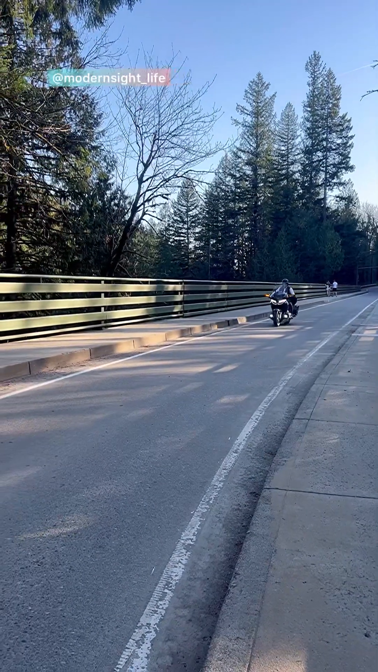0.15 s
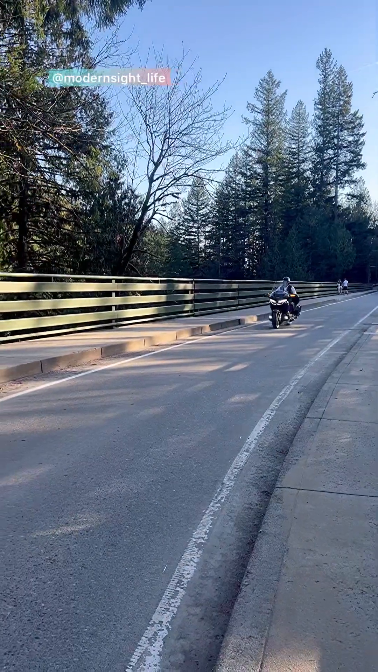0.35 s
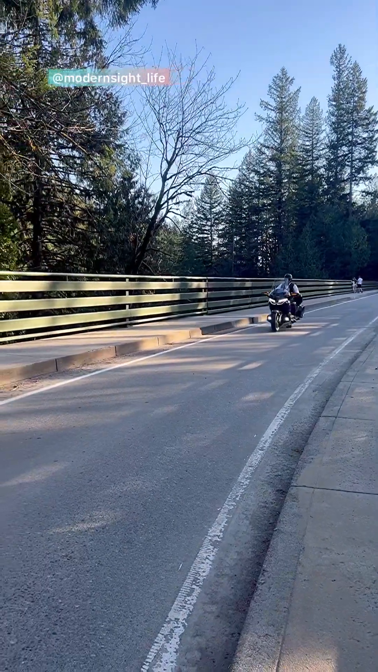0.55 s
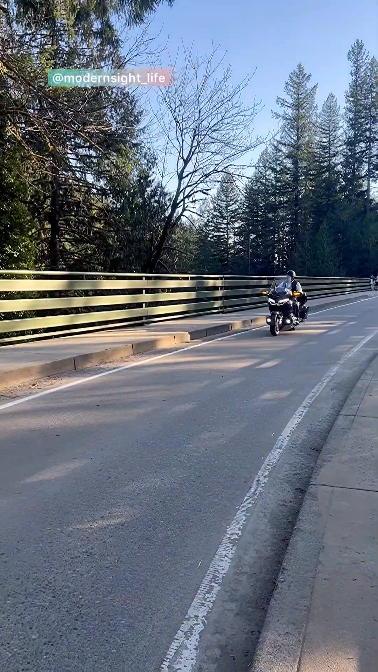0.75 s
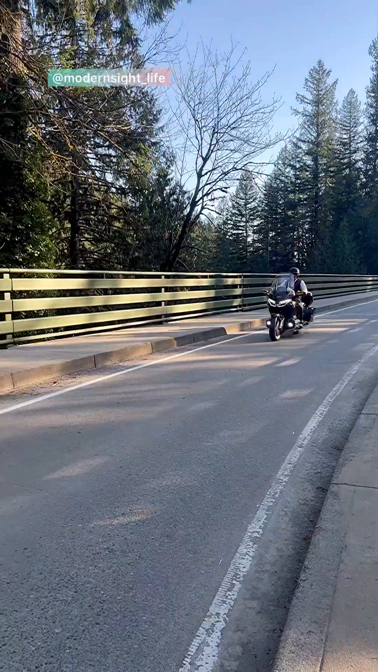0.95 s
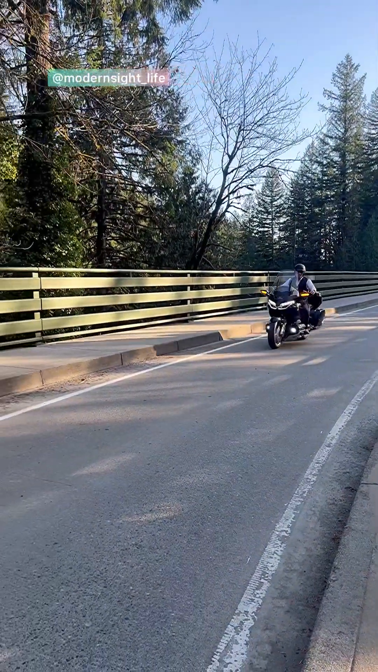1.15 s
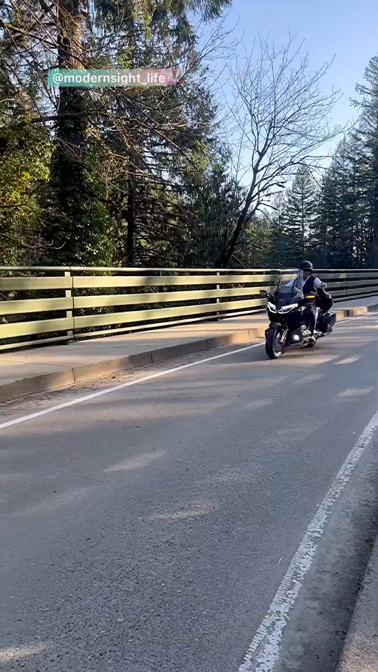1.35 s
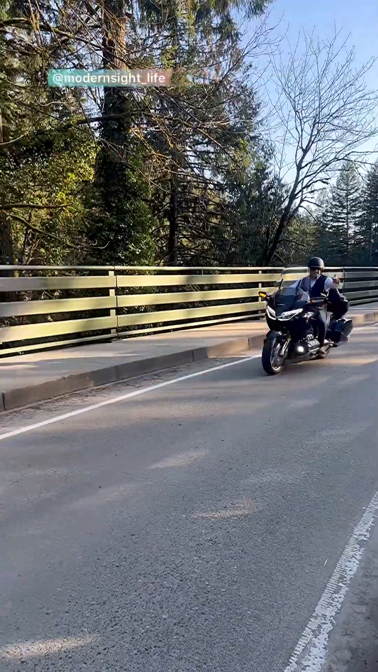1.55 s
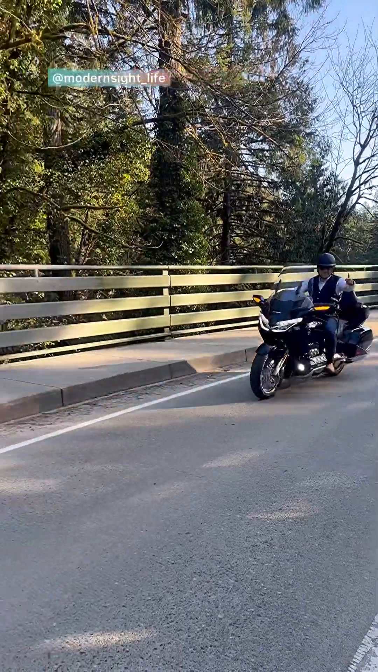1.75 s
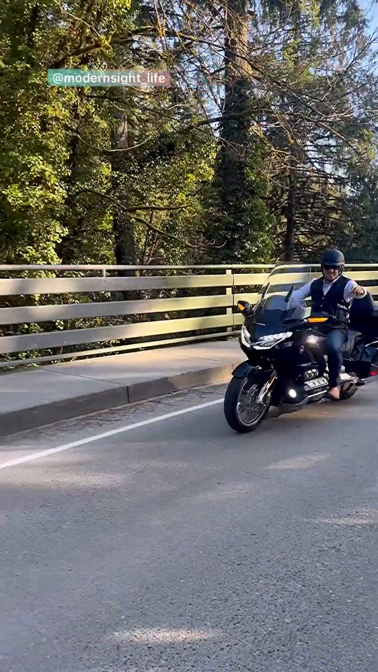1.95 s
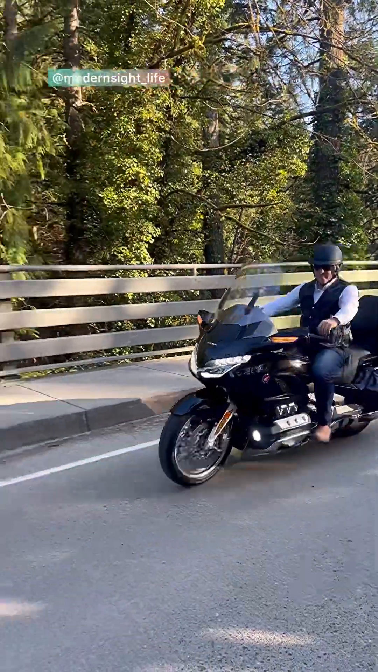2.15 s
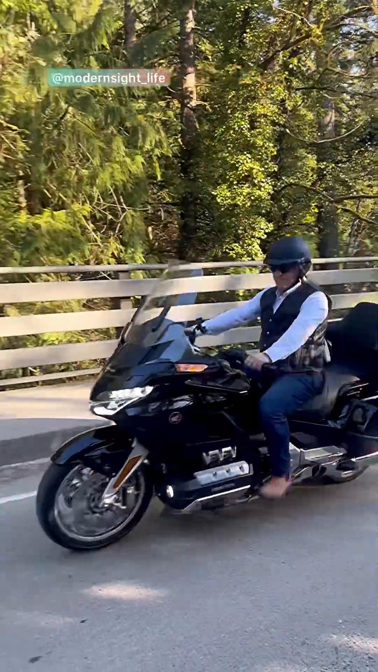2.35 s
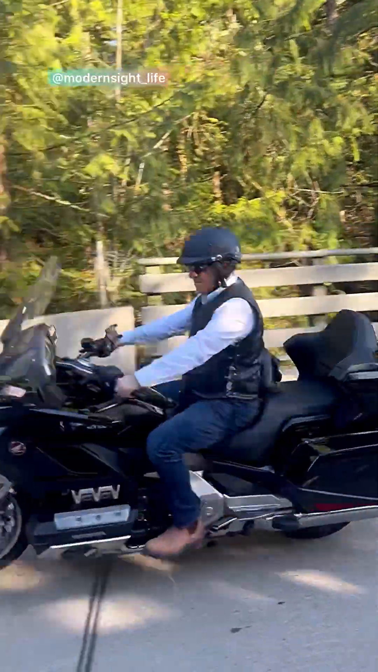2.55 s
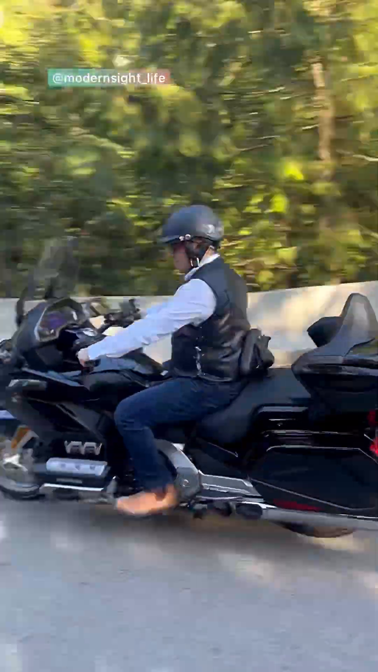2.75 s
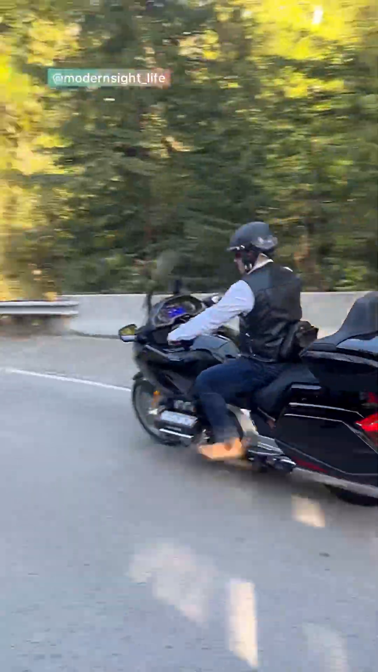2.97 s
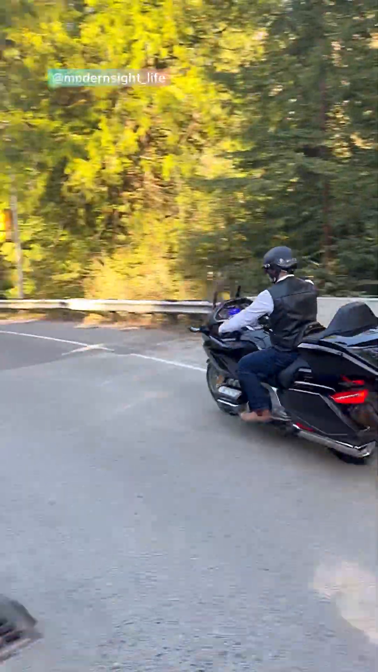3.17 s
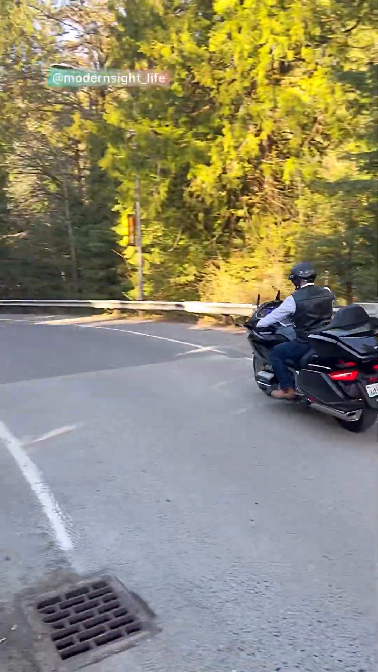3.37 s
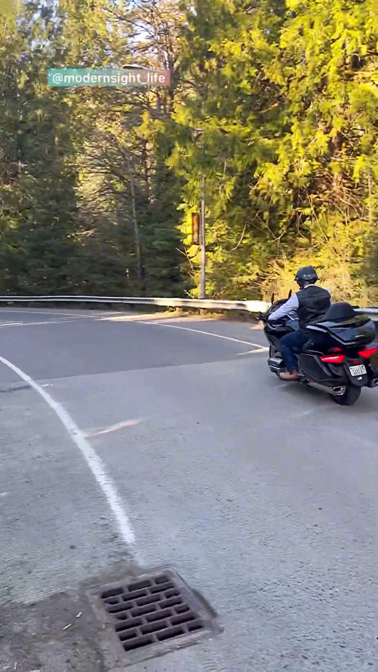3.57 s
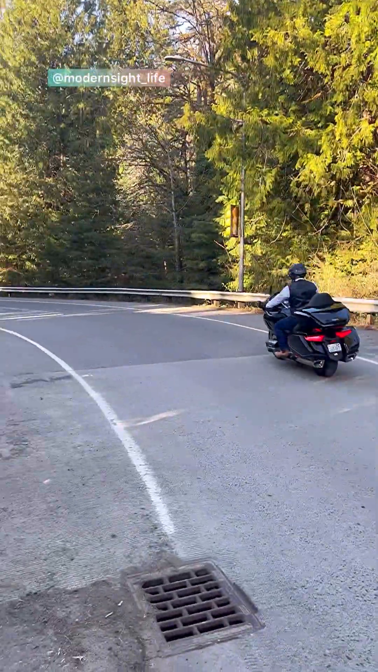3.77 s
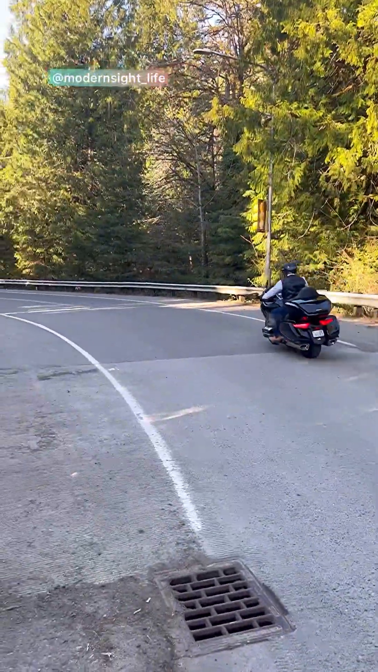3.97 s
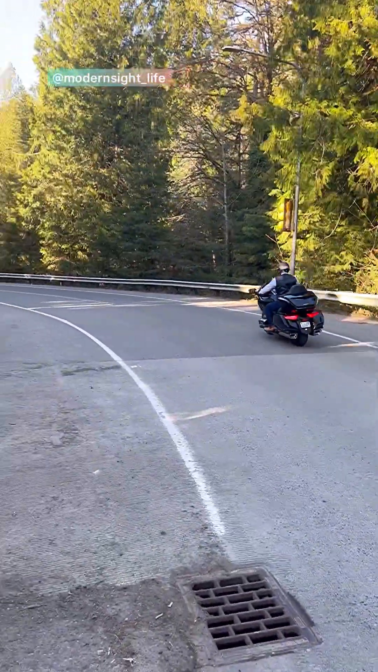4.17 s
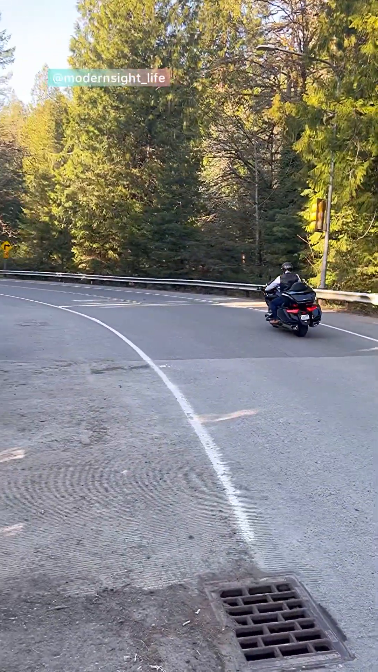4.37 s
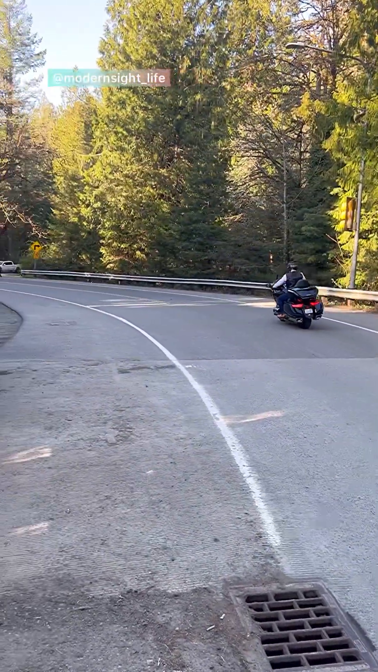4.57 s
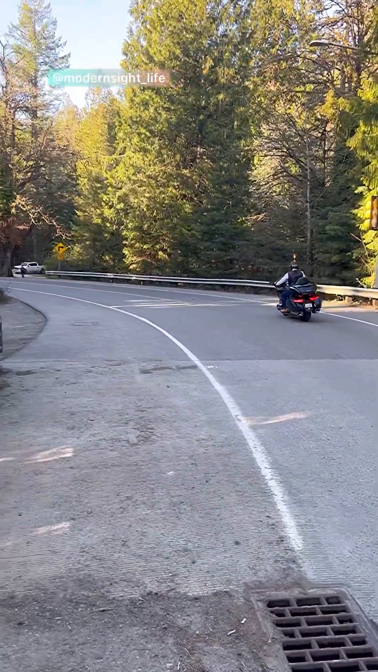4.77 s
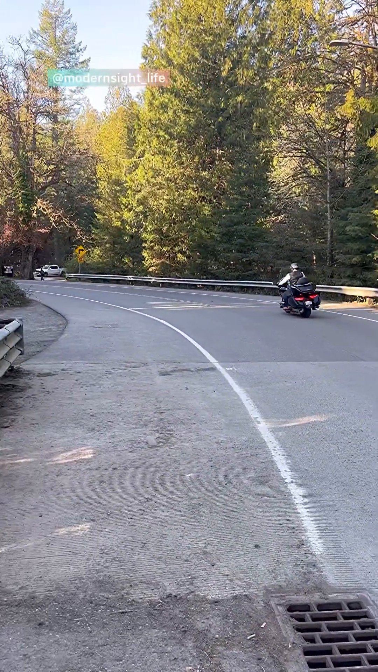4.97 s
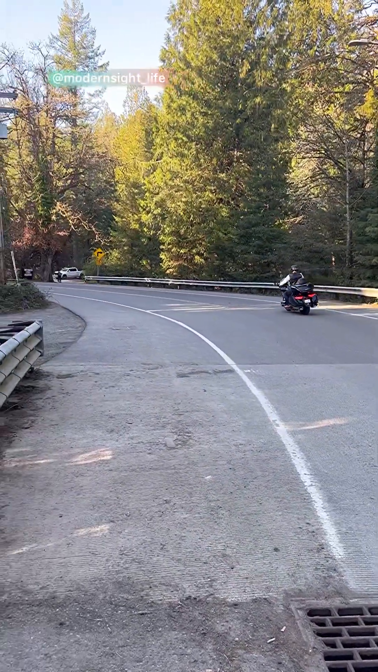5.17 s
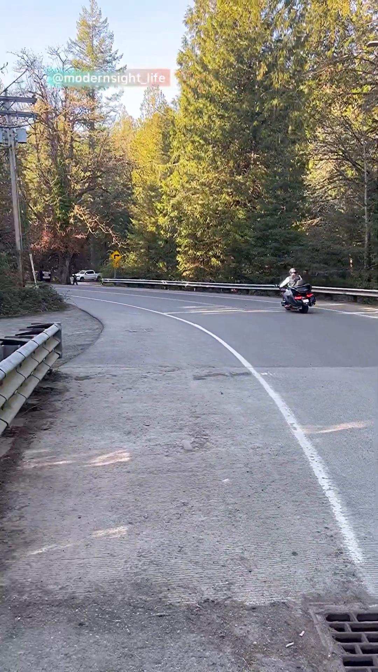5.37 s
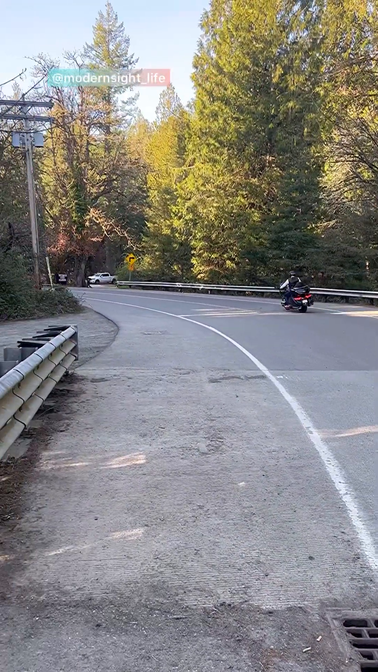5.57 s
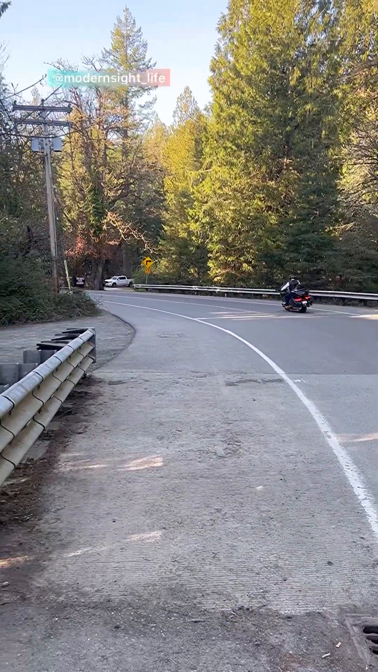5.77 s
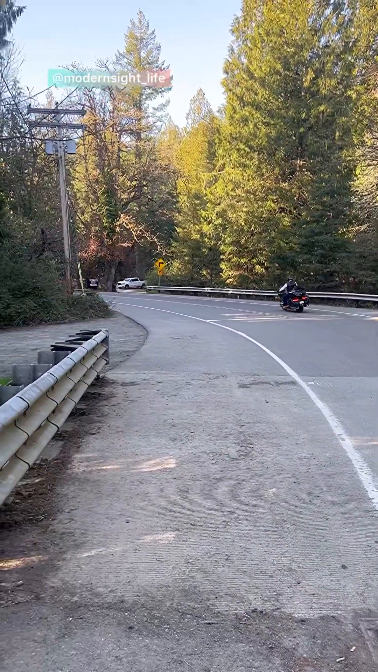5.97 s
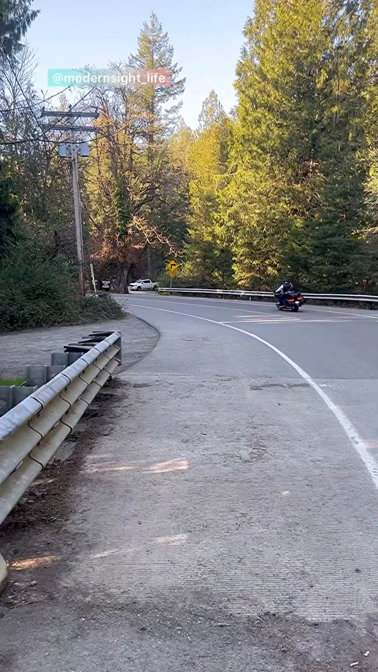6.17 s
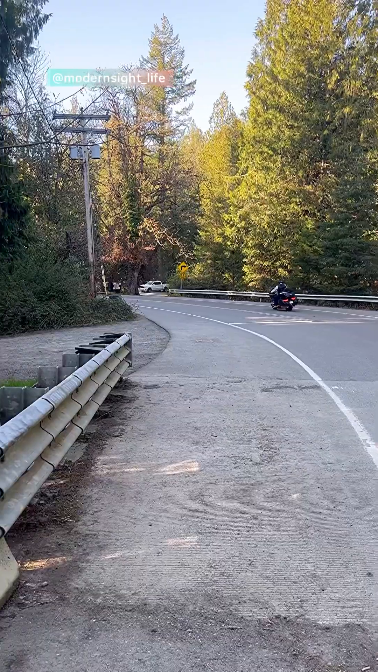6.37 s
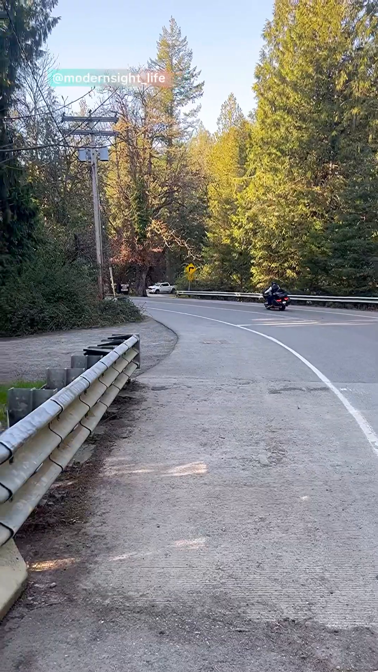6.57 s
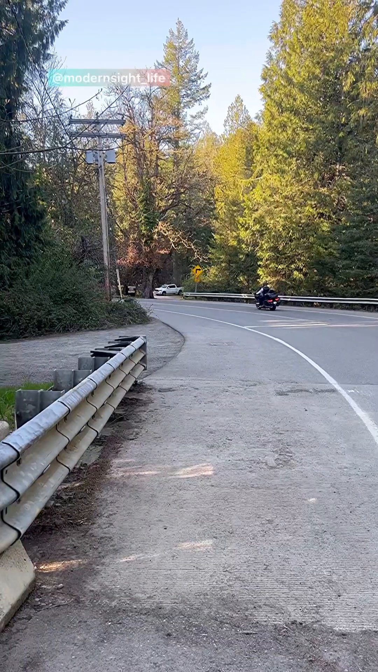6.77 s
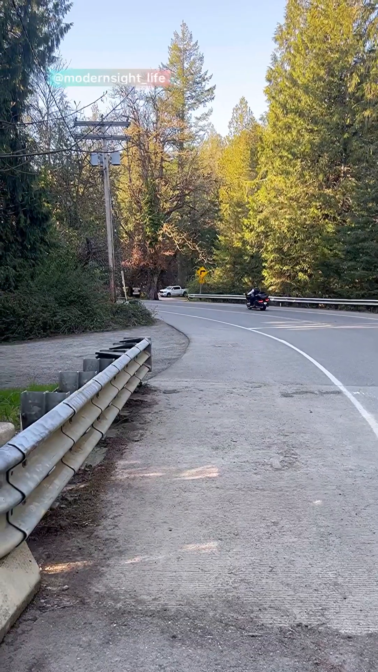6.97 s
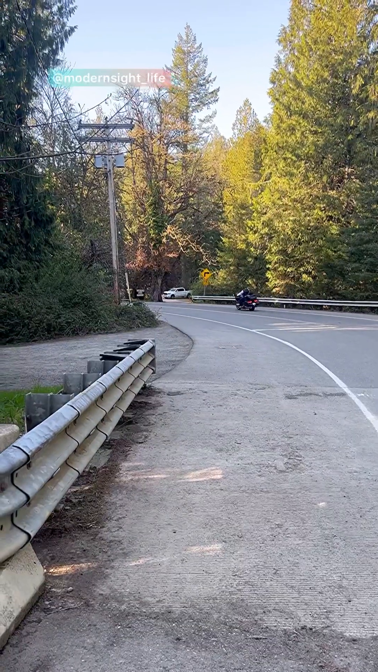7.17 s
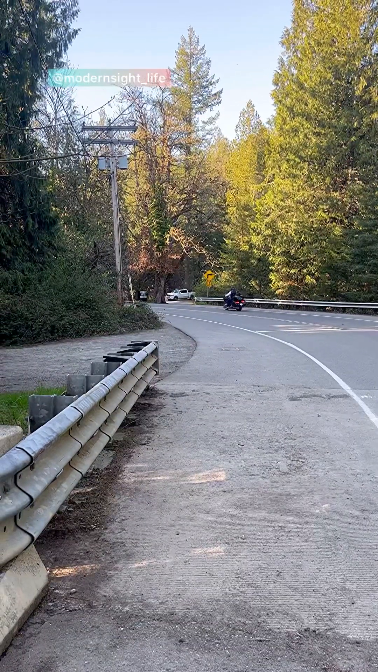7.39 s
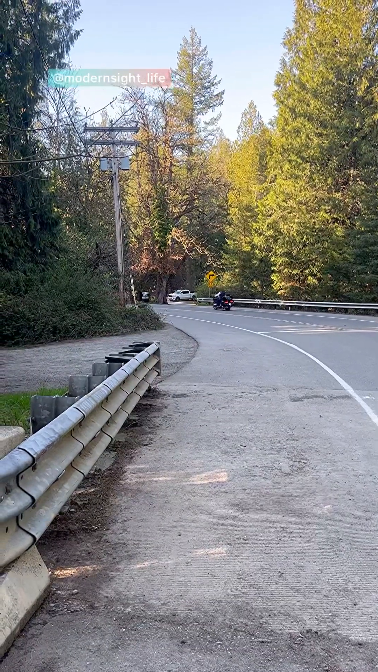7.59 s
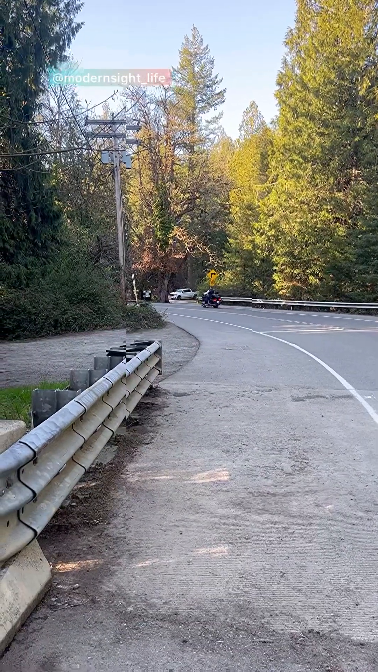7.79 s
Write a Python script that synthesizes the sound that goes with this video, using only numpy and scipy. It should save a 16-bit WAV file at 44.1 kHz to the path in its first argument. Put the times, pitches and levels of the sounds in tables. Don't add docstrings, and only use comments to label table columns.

```python
import sys
import numpy as np
from scipy import signal
from scipy.fft import rfft, irfft, next_fast_len
from scipy.io import wavfile
from scipy.ndimage import uniform_filter1d

SR = 44100
rng = np.random.default_rng(int(sys.argv[2]) if len(sys.argv) > 2 else 0)


def int16_out(signal):
    q = np.round(np.clip(np.atleast_2d(signal).T, -1, 1) * 32767)
    wavfile.write(sys.argv[1], SR, q.astype(np.int16))


def level_to_linear(level):
    exponent = np.asarray(level, float) / 20
    return 10 ** exponent


N = 345567

# t/s, view (0 front, 1 pipes' side, 2 far behind)
FACING = [
    (2.3, 0.25),
    (3.3, 0.7),
    (4.7, 1.3),
    (5.5, 2.17),
]


def evened(x):
    return x / np.sqrt(np.mean(abs(x) ** 2) + 1e-20)


def columns(rows, t):
    s, *values = np.transpose(rows)
    return [np.interp(t, s, v) for v in values]


def on_hz(rows, hz):
    f, *values = np.transpose(rows)
    return [np.interp(np.log(hz + 1), np.log(f + 1), v) for v in values]


def bump(t, s, half):
    return np.exp(-((t - s) / half) ** 2)


def passing(part, t):
    speed_m_s, miss_m = 6.8, 3.08
    closest, near_db, coming, going, far_db = part
    spread_db = -20 * np.log10(np.hypot(1, speed_m_s * (t - closest) / miss_m))
    near_power = level_to_linear(near_db + np.where(t < closest, coming, going) * spread_db) ** 2
    return 10 * np.log10(near_power + level_to_linear(far_db) ** 2)


def lifted(lift_db, t):
    spells = [
        (1.494, 0.69),
        (3.061, 0.33),
        (3.846, 0.37),
        (4.545, 0.32),
        (6.85, 0.46),
        (7.65, 0.21),
    ]
    return sum(db * np.exp(-((t - s) / half) ** 4) for db, (s, half) in zip(lift_db, spells))


def rush():
    # f/Hz, level per Hz/dB
    wash = [(180, -35), (300, -15), (314, -5), (448, -6), (477, -3), (734, -10), (806, -5), (1470, -11),
            (1590, -50), (2520, -17.5), (3490, -23.5), (4980, -18), (12000, -40), (15600, -78),
            (22000, -120)]
    # f/Hz, level per Hz/dB
    rumble = [(22, -48), (45, -38), (90, 10), (180, -1), (300, 0), (440, 1), (520, -15.5), (900, -34)]
    rumble_behind = [(22, -30), (45, -4), (65, -3), (180, -3), (300, 0), (440, -2), (520, -10), (900, -30)]
    roar = [(300, -10), (520, -6), (750, 1), (1000, -1.5), (1500, -5.5), (2200, -11), (4000, -63)]
    roar_behind = [(300, 3.5), (520, -4), (620, 4), (850, -1.5), (980, -7), (1500, -13), (2200, -31.5),
                   (4000, -58)]
    clatter = [(1000, -3), (1600, -0.5), (2200, -2), (2800, -7.5), (4000, -8.5), (4900, -12.5), (5500, -14),
               (6500, -42)]
    hiss = [(4600, -19), (5400, -6.5), (6200, -1), (8000, -1), (10000, -6.5), (12000, -11), (14000, -17),
            (17000, -24)]
    # closest t/s, level there/dB, share of distance law coming, share going, far floor/dB
    exhaust = (2.5, -35.5, 0.45, 0.62, -55)
    tyres = (2.5, -36, 1.14, 0.74, -49.5)
    casings = (2.5, -40.5, 0.44, 0.72, -55)
    fan = (2.5, -38.5, 1.12, 1.7, -68)
    exhaust_lift = (1.2, 2.5, 2, 2.0, -0.49, .3)
    tyres_lift = (0, 3.5, -0.5, 2.5, 0.74, -.3)
    casings_lift = (1.64, 3, 1, .1, 0.8, 0)
    fan_lift = (1.2, -1, 3.5, 1.2, -2.4, -4)
    # t/s, half length/s, rise of clatter and hiss/dB
    scuffs = [
        (2.24, .02, 2),
        (2.715, .01, 3),
        (2.845, .015, 3),
        (2.965, .02, 2.5),
        (3.035, .015, 4),
        (3.58, .03, 2),
        (4.235, .006, 3),
        (4.403, .009, 10),
    ]
    frames, hz = N // 256 + 5, np.fft.rfftfreq(1024, 1 / SR)
    t = np.arange(frames) * 256 / SR
    scuff_db = sum(db * bump(t, s, half) for s, half, db in scuffs)
    rumble_db = passing(exhaust, t) + lifted(exhaust_lift, t)
    roar_db = passing(tyres, t) + lifted(tyres_lift, t)
    clatter_db = passing(casings, t) + lifted(casings_lift, t)
    hiss_db = passing(fan, t) + lifted(fan_lift, t)
    behind = np.clip(columns(FACING, t)[0], 0, 1)
    far_db = hiss_db.max() - hiss_db
    air_db = -.12 * np.outer(np.maximum(hz / 1000 - 8, 0), far_db)

    def layer(colour, level_db, band):
        shape = level_to_linear(on_hz(colour, hz)[0]) ** 2
        in_band = (hz > band[0]) & (hz < band[1])
        return np.outer(shape / shape[in_band].sum(), level_to_linear(level_db) ** 2)

    low, middle, upper, top = (230, 500), (500, 1500), (1500, 5000), (5600, 12000)
    power = layer(clatter, clatter_db + scuff_db, upper)
    power += (1 - behind) * layer(rumble, rumble_db, low)
    power += behind * layer(rumble_behind, rumble_db - 0.5, low)
    power += (1 - behind) * layer(roar, roar_db + 1.31 * scuff_db, middle)
    power += behind * layer(roar_behind, roar_db, middle)
    power += layer(hiss, hiss_db + 1.3 * scuff_db, top)
    power *= level_to_linear(air_db) ** 2
    power += layer(wash, -49 * np.ones(frames), (0, SR))
    draws = rng.standard_normal((frames, 513, 6)).T
    patches = evened(uniform_filter1d(uniform_filter1d(draws[4], 8, 0), 8, 1))
    flicker = evened(uniform_filter1d(uniform_filter1d(draws[5], 120, 0), 3, 1))
    flicker = flicker * np.clip(hz / 2000, 0, 1)[:, None]
    grain = 1 + 0.67 * level_to_linear(-far_db)
    noise = draws[:2] + 1j * draws[2:4]
    spectra = noise * np.sqrt(power) * level_to_linear(grain * (patches + 0.45 * flicker))
    return signal.istft(spectra, nperseg=1024, noverlap=768)[1][:, :N]


def drift(rate, t):
    knots = np.arange(0, t[-1] + .1, .02)
    hz, phase = rate * np.geomspace(.1, 1, 16)[:, None], rng.random((16, 1))
    waves = np.sin(2 * np.pi * (hz * knots + phase)) / np.sqrt(hz)
    return np.interp(t, knots, evened(waves.sum(0)))


def tone(t, turns, level_db, wobble_db, wander):
    phase = 2 * np.pi * turns + wander * drift(6., t)
    return np.sqrt(2) * level_to_linear(level_db + wobble_db * drift(7., t)) * np.cos(phase)


def engine():
    # t/s, firing rate f/Hz, level/dB, octave over firing tone/dB
    running = [(0.0, 72.3, -38.5, 0), (0.6, 67.26, -39, 3.5), (1.0, 64.9, -34.5, 7), (1.4, 63.5, -32, 11),
               (2.4, 60.83, -25.5, 13), (2.6, 58.83, -23, 12), (2.72, 58.48, -16.5, 9.5),
               (3.03, 59.5, -17.5, 8.5), (3.35, 69.33, -24.5, 0.5), (3.62, 72.7, -26.5, -0.5),
               (4.1, 73.86, -27, -8.5), (4.7, 76.28, -29.5, -4), (5.6, 81.46, -30.5, 0.5),
               (6.2, 83.4, -35, -1), (6.7, 85.3, -30, -12.5), (7.36, 87.54, -38, -5.5),
               (7.47, 80.5, -43, -3), (7.8, 71, -38.5, 0.5)]
    # t/s, half length/s, rise of firing rate/Hz, of level/dB, of
    # octave/dB
    blips = [(2.497, .025, 1.0, 6, -6), (2.55, 0.023, -2.5, -1, 4), (2.664, 0.0497, 2.5, -0.5, -4),
             (2.757, 0.029, -1.5, -1, 5), (2.932, 0.05165, 6, 0, -7), (2.998, 0.041, .5, 0, 1),
             (3.152, .055, 13, 4, -6.5), (3.249, .06, 17, 4.5, -3.5), (3.52, 0.064, 3.5, 3.5, -4.5),
             (6.02, 0.11, 0.16, -1.5, 7), (7.424, .04, .5, -7, 3), (7.6, .06, 0, -2, 2)]
    # order, level/dB from front, pipes' side, far behind
    low_orders = [(5, -10, -28, -18), (7, -8, -20, -13), (8, -7, -10, -8), (9, -7, 0, -4),
                  (10, -3, -12, -3), (11, -4, -22, -19)]
    high_orders = [(12.82, -2, -15.5, -9.5), (13.99, -9.5, -3, -3.5), (15.13, 1, -9.5, -7),
                   (15.78, -21, -12, -16.5), (17, 0, -15.5, -17), (17.82, -4, -10, -22),
                   (18.97, -2, -9.5, -36), (19.93, -10.5, -5, -14.5), (21.33, -28, -18, -27),
                   (23.16, -21, -15, -27), (25.92, -13, -12.5, -32.5)]
    # level/dB from front, pipes' side, far behind
    low_under = (-13.5, -6.5, -6)
    high_under = (-12.5, -9.5, -7)
    low_lift = (-15, 0, -1.8, 3.5, -3.5, 0.5)
    high_lift = (-1.2, -2, 0.5, 3, -2.5, 1)
    inverted = (8, 9, 14)
    mesh_ratios = (7.1, 8.53, 10.26)
    # mesh, loudest t/s, level/dB, swell/(dB/s), fade/(dB/s)
    whine = [(0, .3, -52, 8, 12), (0, 1.5, -44, 40, 20), (0, 2.8, -48, 30, 35), (1, 2.8, -50, 30, 14),
             (1, 3.95, -50, 35, 3), (1, 4.7, -50, 3, 3), (1, 5.8, -52.5, 3, 18), (2, 3.3, -53, 25, 18),
             (2, 4.72, -48, 28, 5), (2, 5.9, -52.5, 3, 20)]

    thin = 16
    t = np.arange(N // thin + 2) * thin / SR
    rises = sum(np.outer(rise, bump(t, s, half)) for s, half, *rise in blips)
    firing, loud_db, over_db = columns(running, t) + rises
    first_db = loud_db - 10 * np.log10(1 + level_to_linear(over_db) ** 2)
    cycles = np.cumsum(firing) * thin / (6 * SR)
    view = columns(FACING, t)[0]
    out = tone(t, 6 * cycles, first_db, wobble_db=1.55, wander=0.11)
    flip = .5 * (1 - np.minimum(view, 1))
    out += tone(t, 12 * cycles + flip, first_db + over_db, wobble_db=1.03, wander=0.43)

    for orders, under_db, lift_db in ((low_orders, low_under, low_lift), (high_orders, high_under, high_lift)):
        level_db = loud_db + np.interp(view, range(3), under_db) + lifted(lift_db, t)
        for order, *views_db in orders:
            turns = order * cycles + .5 * (order in inverted)
            order_db = level_db + np.interp(view, range(3), views_db)
            out += tone(t, turns, order_db, wobble_db=1.3, wander=.22)

    for k, ratio in enumerate(mesh_ratios):
        swells_db = [db + np.minimum(swell * (t - s), fade * (s - t))
                     for which, s, db, swell, fade in whine if round(which) == k]
        wobble_db, wander = (2.5, 1.2, 1.6)[k], (1.8, 1., 1.3)[k]
        out += tone(t, ratio * 6 * cycles, np.max(swells_db, 0), wobble_db, wander)
    return signal.resample_poly(out, thin, 1)[:N]


def knocks():
    # t/s, peak level/dB, ring f/Hz, ring t60/s, scrape level/dB
    joints = [
        (0.298, -20.5, 360, 0.057, -41),
        (0.486, -22.5, 215, 0.078, -35),
        (0.822, -35, 2410, 0.045, -54),
        (2.489, -11.5, 162, 0.13, -30.5),
        (2.606, -32, 300, 0.048, -29),
        (2.711, -20, 50.4, 0.12, -32),
        (2.78, -23.5, 277, 0.16, -42),
        (3.028, -38, 405, .03, -42),
        (3.067, -28, 399, 0.028, -31),
    ]
    out, t = np.zeros(N + SR), np.arange(SR // 4) / SR
    for s, peak_db, hz, t60, scrape_db in joints:
        ring = level_to_linear(peak_db - 60 * t / t60) * np.sin(2 * np.pi * hz * t)
        dull = signal.lfilter([.5], np.poly([.8, .5]), rng.standard_normal(len(t)))
        scrape = dull * level_to_linear(scrape_db - 60 * t / 0.057)
        soft_start = 1 - np.exp(-t / 0.0021)
        out[round(s * SR):][:len(t)] += (ring + scrape) * soft_start
    return out[:N]


def scene():
    direct = engine() + knocks()
    late = np.roll(direct, 900)
    return rush() + np.array([direct, late])


def band_limit(x):
    return signal.sosfilt(signal.butter(12, 15750, fs=SR, output="sos"), x)


def record(dry):
    # f/Hz, difference over sum/dB, likeness 0-1, phase/rad
    port_pair = [(60, -33.5, 1, 4.5), (170, -20, 0.92, 3.5), (444, -4.5, 1, 2), (900, -2, 0.8, 1.32),
                 (1300, -1.5, 0.44, 0.5), (1980, -9, 0.4, 1.0), (2750, 8, 0.45, 1.5),
                 (3300, 4.5, 0.07, -0.5), (4400, -5, .5, -1.5), (5300, 0, .5, -1), (6900, -28, 0.1, 10),
                 (8240, -7.5, .6, -1.5), (10400, -1.5, .65, -1.5), (12800, 4, .6, -1.5)]
    size = next_fast_len(N)
    hz = np.fft.rfftfreq(size, 1 / SR)
    over_db, like, phase = on_hz(port_pair, hz)
    like = np.clip(like, 0, 1)
    total, scattered = rfft(dry, size)
    copy = like * np.exp(1j * phase) * total
    apart = level_to_linear(over_db) * (copy + np.sqrt(1 - like ** 2) * scattered)
    total = total * np.clip((12450 - hz) / 300, 0, 1)
    total = total * level_to_linear(-6 * bump(hz, 5375, 300))
    total = total / np.sqrt(1 + (38 / (hz + 1)) ** 8)
    ports = irfft(np.array([total + apart, total - apart]), size)[:, :N]
    return band_limit(ports)


dry = scene()
out = record(dry)
int16_out(out)
```